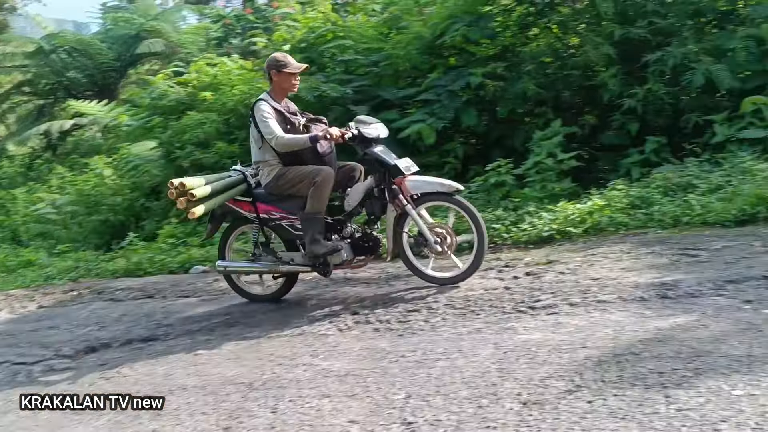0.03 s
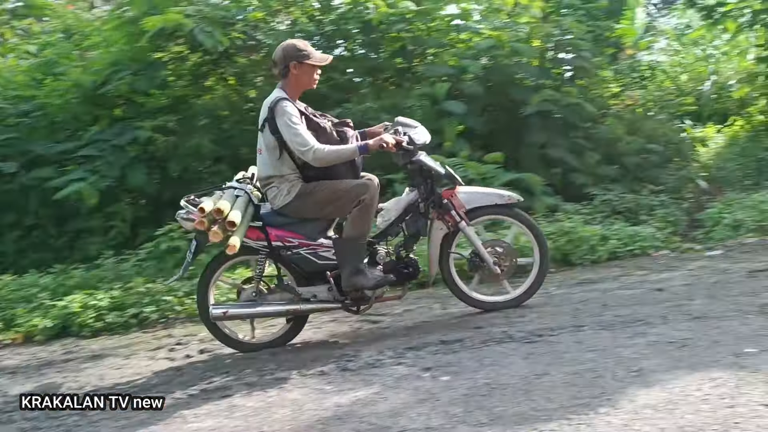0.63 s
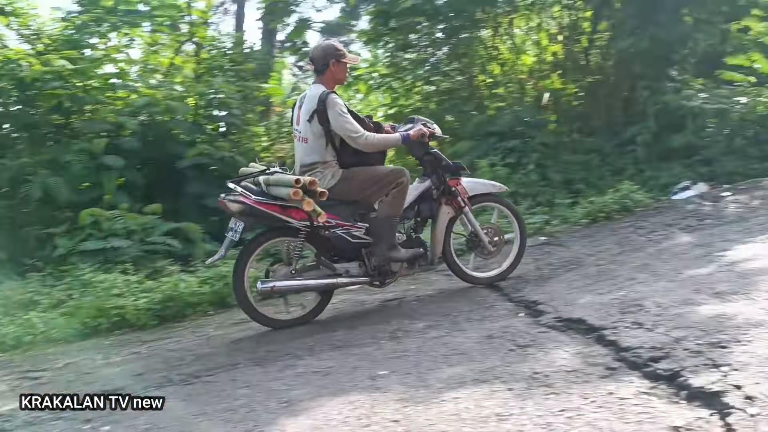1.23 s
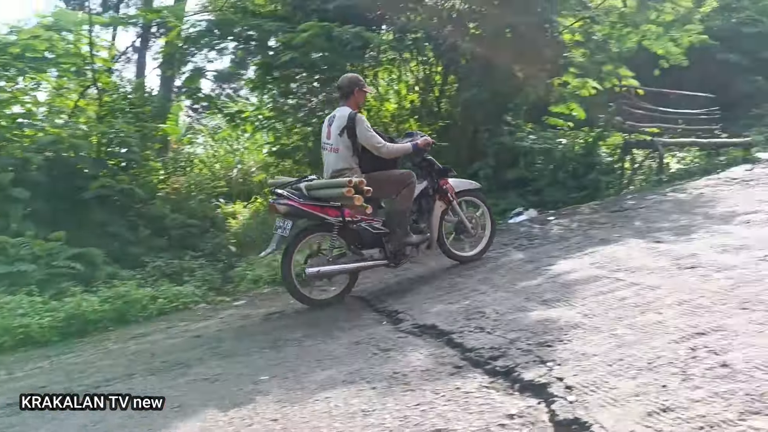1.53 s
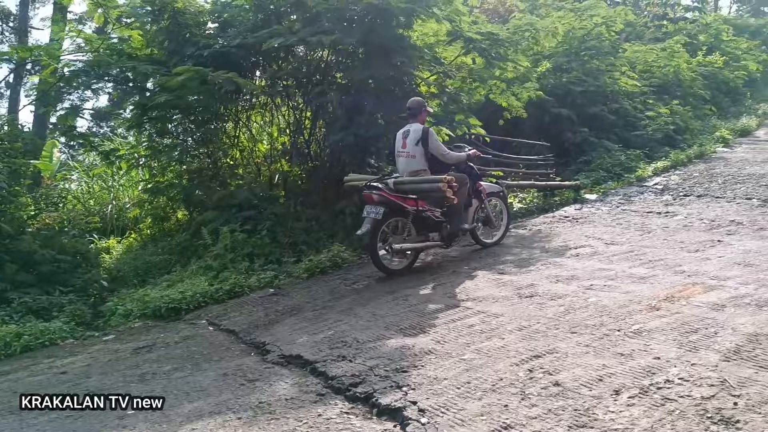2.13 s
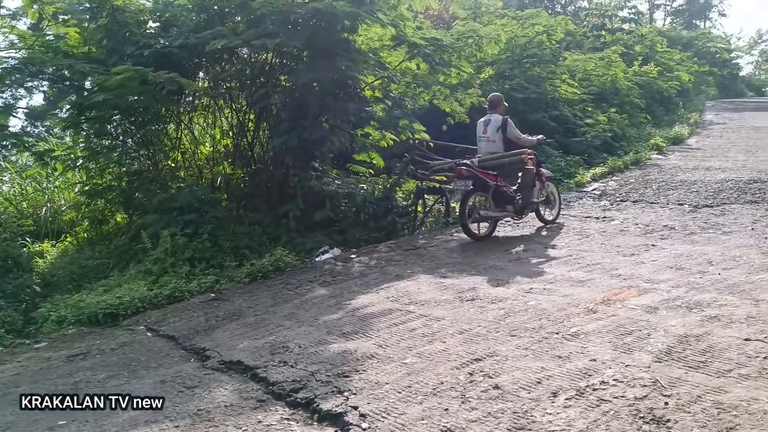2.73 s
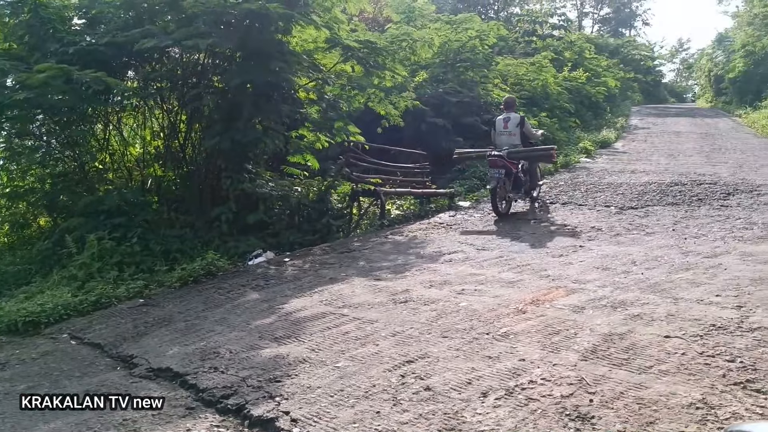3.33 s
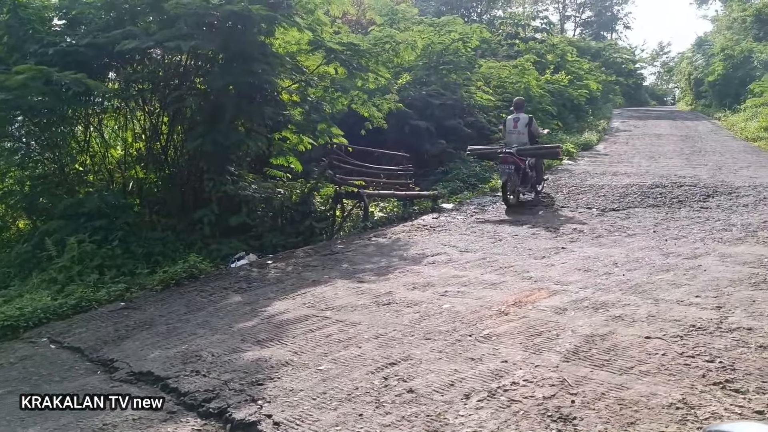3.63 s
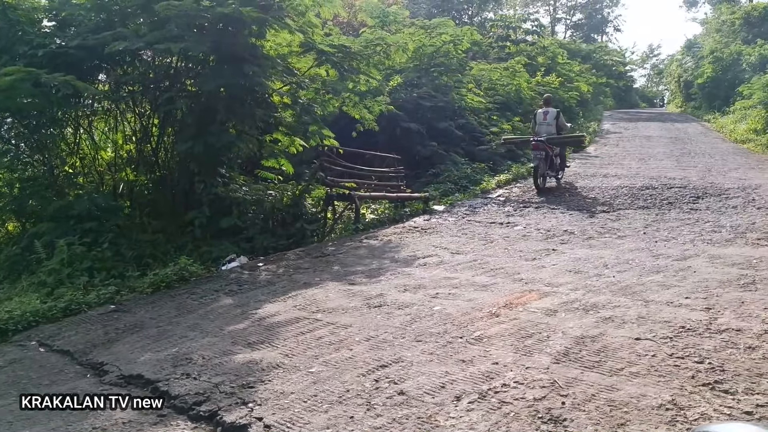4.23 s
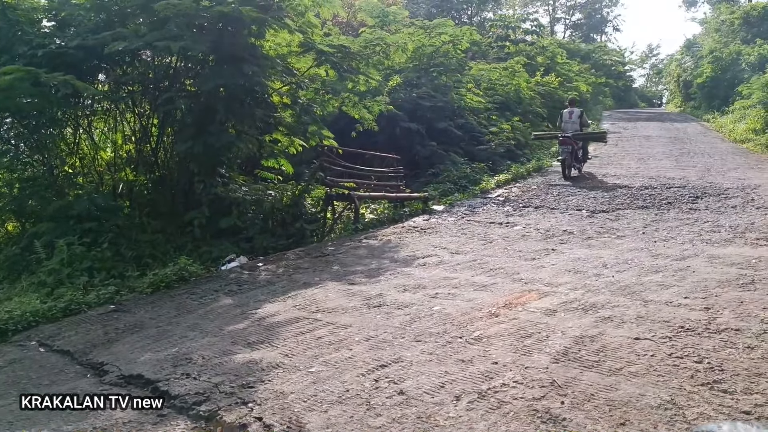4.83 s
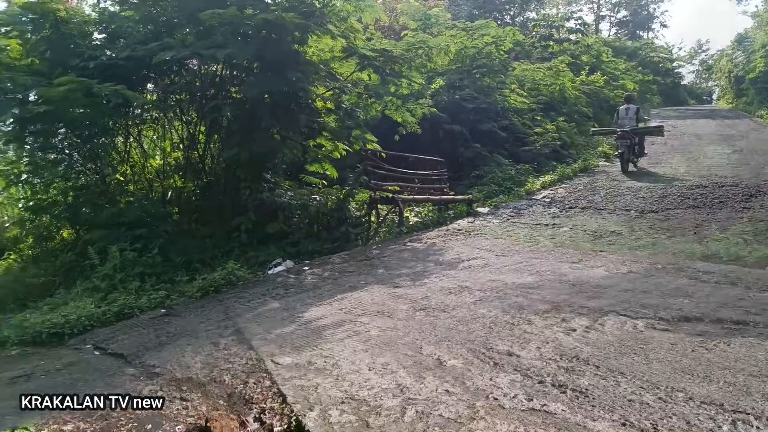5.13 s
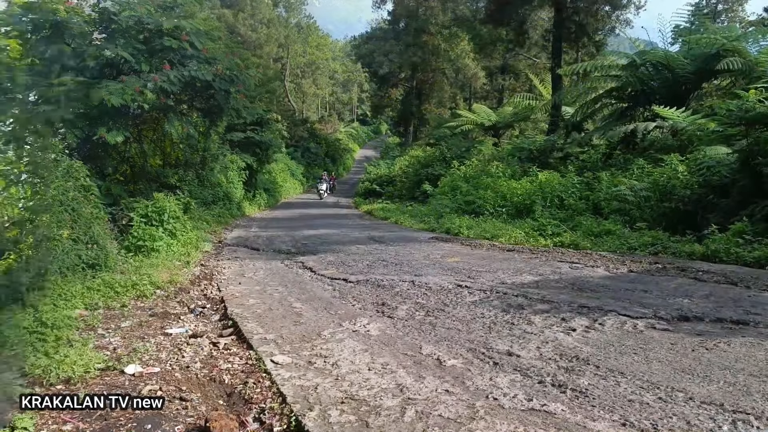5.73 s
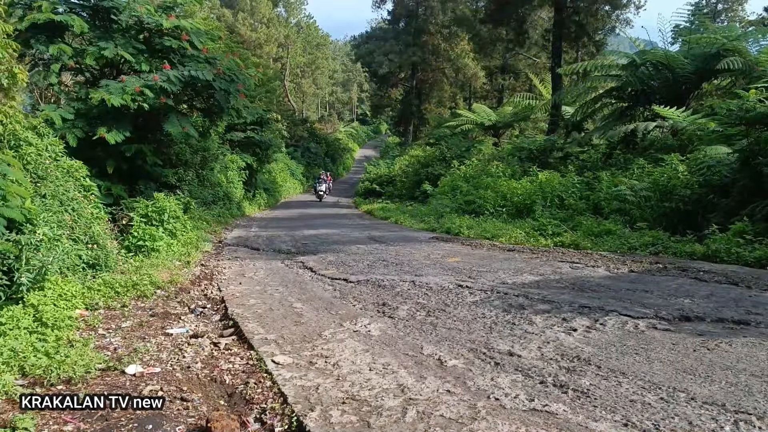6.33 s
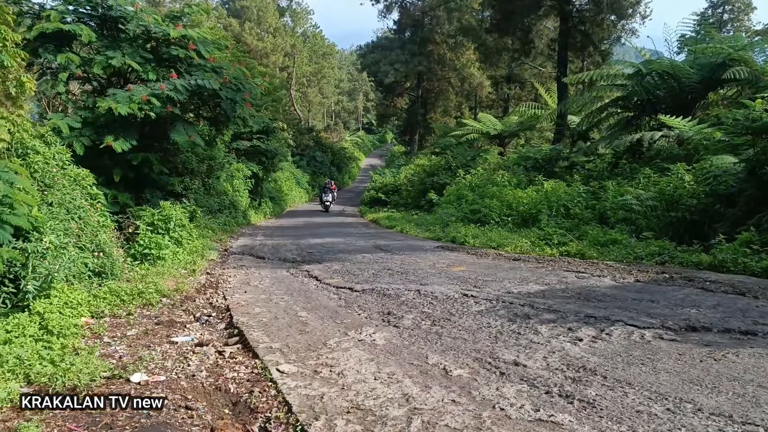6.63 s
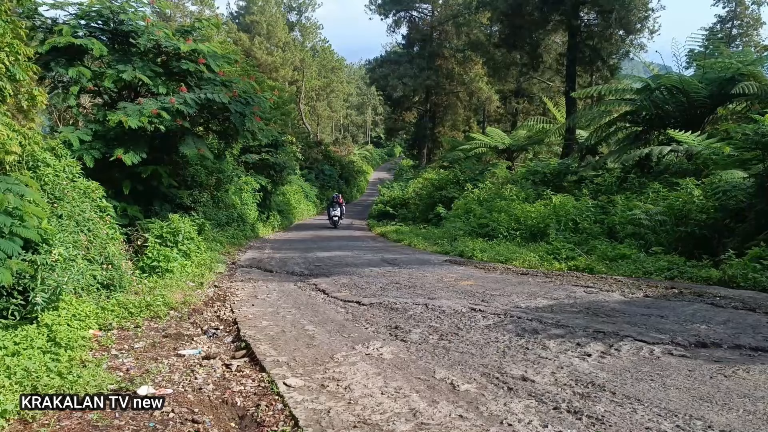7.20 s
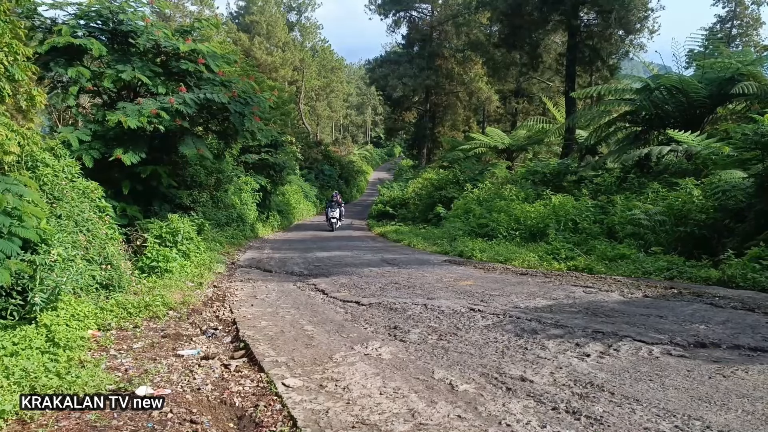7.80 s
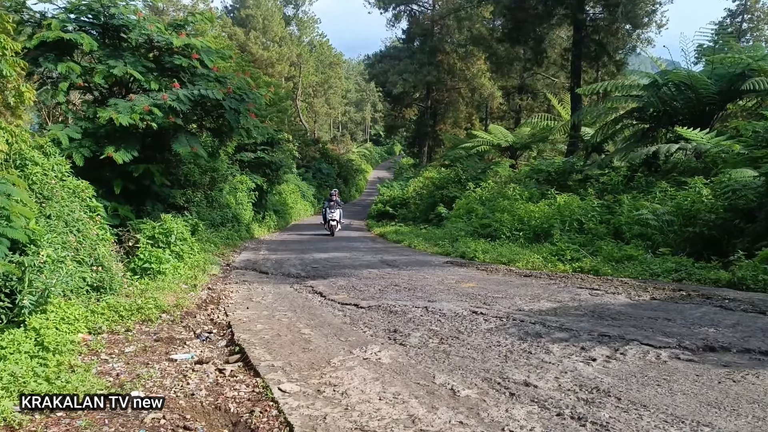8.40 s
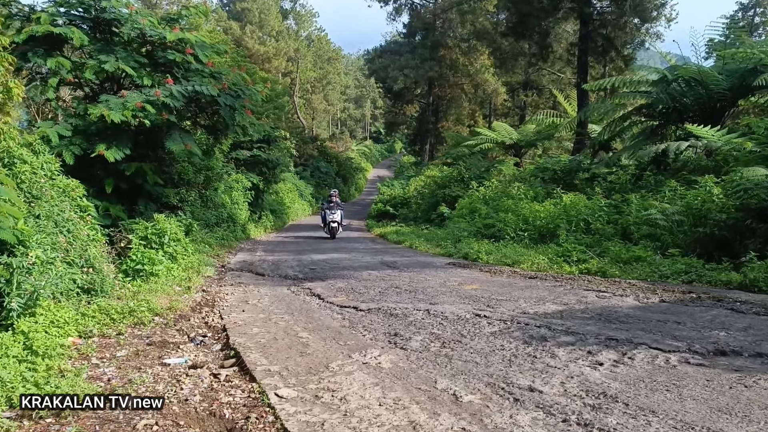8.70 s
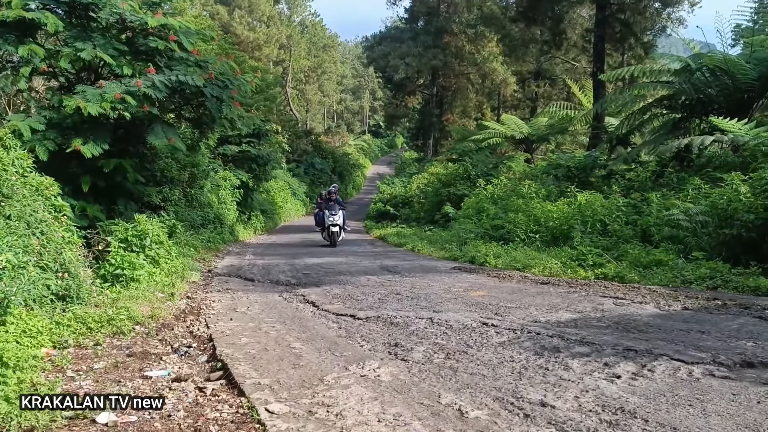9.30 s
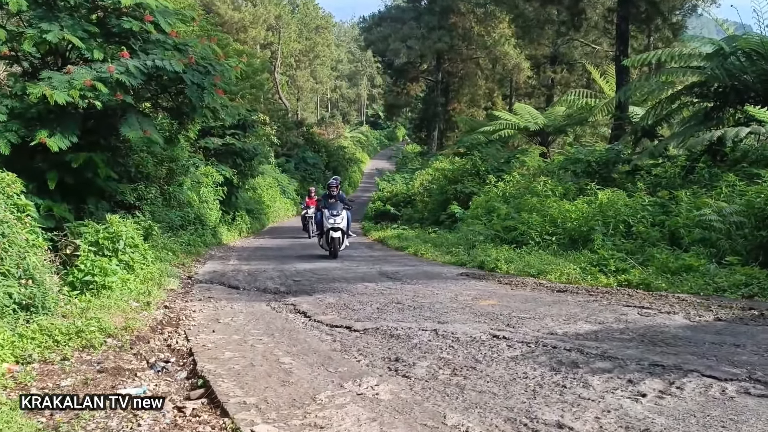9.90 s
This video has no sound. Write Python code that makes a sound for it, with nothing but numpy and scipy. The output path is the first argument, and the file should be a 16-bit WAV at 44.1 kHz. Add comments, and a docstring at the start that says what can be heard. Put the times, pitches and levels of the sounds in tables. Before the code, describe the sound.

A small motorbike labours past close by and climbs away, then several distant motorbikes drone over a faint forest hiss.

```python
"""Motorbikes on a forest hill

A small four-stroke motorbike labours past, close by, and climbs away up a steep road. Each firing rings
its silencer with a thud. The hill drags its revs down, and at each bump the rear wheel goes light, so
the engine races and its metal rings. After a moment of silence the sound fades in further along the
road: three distant bikes drone uphill, scattered by the trees, over the steady hiss of the forest."""
import sys
import numpy as np
from scipy import signal
from scipy.fft import rfft, irfft
from scipy.io import wavfile
from scipy.ndimage import uniform_filter1d

SR = 44100
rng = np.random.default_rng(int(sys.argv[2]) if len(sys.argv) > 2 else 0)


def transcribe(signal):
    """Save signal, clipped to [-1, 1], as a 16-bit WAV file at the path in sys.argv[1]."""
    frames = np.atleast_2d(signal).T
    limited = np.clip(frames, -1, 1)
    pcm = np.round(limited * 32767).astype(np.int16)
    wavfile.write(sys.argv[1], SR, pcm)


N = 438794
TIME = np.arange(N) / SR
SILENCE_FROM_S, RESUME_S, FADE_S = 5.203, 5.272, 0.31

# The near bike's revs as it climbs: time_s, firings_per_s
NEAR_REVS = [(0.0, 37.25), (0.75, 36.51), (1.15, 34.74), (1.6, 35.98), (1.9, 34.7), (2.7, 34.2),
             (3.05, 35.32), (3.6, 34.75), (3.85, 32.56), (4.1, 34.18), (4.5, 31.24), (4.7, 33.42),
             (5.2, 32.67)]
# Bumps that lighten its rear wheel: start_s, surge_firings_per_s
ROAD_BUMPS = [(0.32, 0.82), (0.55, 1.41), (1.45, 1.63), (1.68, 1.41), (1.97, 0.61), (3.02, 0.84),
              (3.36, 0.94), (4.03, 5.15), (4.84, 1.91)]
# Its loudness sinks as the bike draws away, then the sound fades out just before the silence:
# time_s, level_db
NEAR_LEVEL = [(0, -18), (1.3, -18), (2.3, -19), (3.35, -20), (3.95, -22.5), (4.5, -23.5), (4.95, -27),
              (5.2, -31)]
# Where we hear it from: time_s, view (0 beside, 1 behind, 2 or more far behind)
NEAR_VIEW = [(0, 0), (2.0, 0.66), (2.8, 1.02), (3.45, 1.43), (3.85, 2), (5.2, 3)]
# The tone of its silencer from those three views: pitch_hz, level_db
SILENCER_BESIDE = [(35, -35), (70, -7), (100, -10), (135, -21.5), (175, 0.5), (215, 1.5), (245, 0),
                   (262, 0.5), (292, -11), (335, -3), (420, -10), (495, -26.5), (660, -16.5), (950, -37),
                   (2500, -69)]
SILENCER_BEHIND = [(35, -36), (70, -8), (105, -13.5), (130, -10), (160, -9), (210, -5.5), (247, 3),
                   (282, -19.5), (312, -7), (390, -9.5), (425, -13.5), (475, -35), (660, -20.5), (950, -34),
                   (2500, -46.5)]
SILENCER_FAR = [(35, -31), (70, -10.5), (100, -10.5), (130, -11), (175, 2.5), (200, 2), (245, -2),
                (275, -13), (312, -2), (370, -12), (490, -23.5), (820, -22.5), (1300, -36.5), (2500, -37)]
# The tone of its rushing gas, and of its clattering valves and chain: pitch_hz, level_db
RASP_TONE = [(200, -0.5), (700, -2), (1300, -12), (2200, -5), (5000, -4), (8000, -5.5), (11000, -6),
             (16000, -21)]
CLATTER_TONE = [(100, 4.5), (600, 2.5), (1300, -3.5), (1900, -2.5), (2500, -2.5), (5600, -4), (6400, -6.5),
                (10000, -11), (13000, -19), (16000, -22)]
# The notes of its engine case and cooling fins: pitch_hz, width_hz, beside_db, behind_db
CASE_NOTES = [(1280, 107, -3.5, -15.5), (3358, 170, -3.5, 2), (3545, 120, 3.5, -6.5), (4270, 300, 0, -12),
              (4670, 120, -3.5, -1), (5240, 220, -4, -3)]
# Moments when a metal part faces us and sounds louder: part_name, peak_s, width_s, gain_db
FACING_MOMENTS = [("low mode", 0.19, 0.13, 4), ("low mode", 1.29, 0.22, 5.6),
                  ("high mode", 0.32, .42, 11.3), ("valve", 0.75, 0.36, 13.7), ("valve", 1.36, .25, 9.3),
                  ("valve", 4.58, 0.4, 8)]

# The far bikes' revs: time_s, scooter_firings_per_s, underbone_firings_per_s, third_firings_per_s
FAR_REVS = [(5.3, 42.5, 34.2, 56.8), (6.3, 42.8, 34.2, 56.7), (7.8, 42.7, 35.8, 53.7),
            (8.3, 43.3, 36.1, 53), (9.95, 43.2, 35.9, 51.6)]
# One row for each far bike, in that order: start_db, change_db_per_s, rev_waver_share
FAR_BIKES = [(-39, 1.5, .004), (-38, 0.18, .009), (-36.3, -0.27, 0.005975)]
# The tone of their silencers: pitch_hz, level_db
SCOOTER_SILENCER = [(43, -33.5), (86, -4), (129, -16.5), (172, -2), (214, 2.5), (258, -3), (300, -5),
                    (345, -18), (425, -11.5), (480, -28), (780, -14.5), (1150, -22.5), (1600, -25),
                    (2000, -44.5)]
UNDERBONE_SILENCER = [(35, -23), (70, -7), (105, -8.5), (140, -12), (175, -4), (208, 3), (245, 0),
                      (285, -11.5), (390, -8.5), (480, -23), (800, -22.5), (1500, -36), (2000, -38)]
THIRD_SILENCER = [(53, -25), (108, -0.5), (160, -14.5), (215, -8), (270, -10), (330, -16), (600, -19),
                  (1500, -42)]
# The underbone (a light step-through bike) is given more throttle: peak_s, gain_db
THROTTLE_PUSHES = [(6.2, 4.5), (7.7, 5), (9.7, 6.5)]
# The tone of the scooter's drive, of tyres and air, and of the forest: pitch_hz, level_db
BUZZ_TONE = [(400, -17.5), (600, -2.5), (740, 0), (900, -5.5), (1170, -5.5), (1600, -8.5), (2100, -19.5)]
RUSH_TONE = [(25, -22), (80, -1.5), (250, 2), (500, -1.5), (850, -1.5), (1200, -3), (1600, -4.5),
             (1900, -15.5), (3000, -20.5)]
FOREST_TONE = [(1500, -2.5), (2000, -7), (2400, 0), (2800, -8.5), (3500, 1), (4000, -4.5), (4800, 1.5),
               (5600, 1), (6200, -2.5), (7200, -18), (8500, -21), (9500, -9), (11000, -14.5),
               (13000, -30.5), (16000, -21)]

# The tone of the microphone's two openings: pitch_hz, left_db, right_db
MIC_TONE = [(980, 1, 1), (1370, -3, 0), (2340, 0.5, -1), (3380, 3, -4), (4770, 1, -2), (5670, 5, -3.5),
            (6280, -2, -1.5), (7470, -9.5, 4.5), (7720, -11, 0), (9090, 4, -7.5), (10120, 8, -13),
            (12650, -1, -2.5), (16000, -3.5, -0.5)]
# How strongly scattered sound differs between left and right: pitch_hz, difference_db
STEREO_SPREAD = [(60, -11.5), (200, -5.5), (500, -5.5), (1000, -6.5), (2000, 1.5), (16000, 1.5)]


def near_bike():
    """One cylinder working hard; from behind, the bike blocks some of its own clatter."""
    surge = wheel_hop()
    revs = in_time(NEAR_REVS)[0] + surge
    cycles = np.cumsum(revs) / SR + .45   # goes up by one for each firing
    level_db, view = in_time(NEAR_LEVEL)[0], in_time(NEAR_VIEW)[0]
    away = np.clip(view, 0, 2)
    thuds = from_db(level_db + 0.57 * surge) * exhaust(cycles, away)
    metal_db = level_db - 11 - 2 * view + 0.23 * surge
    left, right = thuds + from_db(metal_db) * engine_metal(cycles, revs, surge, away)
    lag_s = np.interp(TIME, [0, 5], [0, .0001])   # it moves off to the right, so the left hears it later
    return np.array([np.interp(TIME - lag_s, TIME, left), right])


def wheel_hop(bounce_hz=3.5, decay_s=.25):
    """Extra firings per second: after each bump the revs swing with the rear spring and settle."""
    surge = 0
    for start_s, size in ROAD_BUMPS:
        age_s = np.maximum(TIME - start_s, 0)
        surge = surge + size * np.sin(2 * np.pi * bounce_hz * age_s) * np.exp(-age_s / decay_s)
    return surge


def exhaust(cycles, away):
    """Each burst of gas rings the silencer; with distance the tone shifts and more of it is echo."""
    clicks = firings(cycles, uneven_db=.5, jitter_s=.00006)
    tones = (SILENCER_BESIDE, SILENCER_BEHIND, SILENCER_FAR)
    shares = [np.maximum(1 - abs(away - view), 0) for view in range(3)]
    thuds = steady(sum(share * colour(clicks, tone) for share, tone in zip(shares, tones)))
    # A bounce off the uneven road, its path always changing, keeps shifting the tone.
    bounce_s = .006 + .0012 * drift(2.5)
    thuds = steady(thuds + from_db(-19 + 2 * away) * np.interp(TIME - bounce_s, TIME, thuds))
    travel = 2.183 * TIME   # the paths through the trees change as the bike moves
    echo = sum(share * tree_echo(thuds, fade_s=0.39, above_hz=422)
               for share in (np.cos(travel), np.sin(travel)))
    return thuds + from_db(-9 + 5.5 * away) * echo


def engine_metal(cycles, revs, surge, away):
    """Valves and chain shake the engine hardest just before each thud; gas rasps out with the thud."""
    knocks = 0.84 + 0.21 * knock(cycles, -.1, 0.06) + 0.47 * knock(cycles, -.3, 0.14)
    shake = rms_one(knocks) * from_db(drift(130))
    blows = shake * direct_stereo(rng.standard_normal((2, N)))
    ringing = from_db(-1.5) * case_ring(blows, away) + valve_tick(blows, cycles, surge)
    rasp = from_db(-7) * gas_rasp(cycles)
    clatter = from_db(1) * shake * noise(CLATTER_TONE, spread_db=-1)
    return ringing + rasp + clatter + shake * chain_song(revs, surge, away) + gear_whine(cycles)


def case_ring(blows, away):
    """Blows ring the engine case and fins; the mix of notes changes as we get behind the bike."""
    behind = np.minimum(away, 1)
    ring = 0
    for pitch_hz, width_hz, beside_db, behind_db in CASE_NOTES:
        level_db = beside_db + (behind_db - beside_db) * behind + 2 * drift(14)
        ring = ring + from_db(level_db) * resonate(blows, pitch_hz, width_hz)
    return rms_one(ring)


def valve_tick(blows, cycles, surge):
    """The valves give a ringing tick once a cycle, louder when the engine races."""
    taps = blows * (0.14 + knock(cycles, -0.11, 0.14)) * from_db(2.3 * drift(25))
    level_db = -11 + 1.3 * surge + facing_db("valve")
    return from_db(level_db) * resonate(taps, pitch_hz=4110, width_hz=190)


def gas_rasp(cycles):
    """Gas rushes out in a hissing puff at each firing."""
    hiss = noise(RASP_TONE, spread_db=-4)
    return hiss * rms_one(knock(cycles, .04, .17) * from_db(1.5 * drift(35)))


def chain_song(revs, surge, away):
    """Chain and gears sing two notes; the low one climbs with the revs and flares when the wheel hops."""
    low_hz = 2380 + 44.8 * (revs - 35)   # the bike cruises at 35 firings per second
    low_db = -5.5 + 2.5 * surge + facing_db("low mode") - 1.5 * away + 2 * drift(12)
    high_db = -13 + facing_db("high mode")
    low = from_db(low_db) * metal_note(low_hz, width_hz=190)
    return low + from_db(high_db) * metal_note(pitch_hz=5745, width_hz=110)


def metal_note(pitch_hz, width_hz):
    """Many small blows keep one note of the metal ringing."""
    smoothing = signal.butter(2, width_hz / 2, fs=SR, output="sos")
    flutter = signal.sosfilt(smoothing, rng.standard_normal((2, 2, N)))
    phase = 2 * np.pi * np.cumsum(pitch_hz * np.ones(N)) / SR
    return rms_one(direct_stereo(flutter[0] * np.cos(phase) + flutter[1] * np.sin(phase)))


def facing_db(part):
    """How much louder a metal part gets as it faces us."""
    return sum(gain_db * swell(peak_s, width_s)
               for name, peak_s, width_s, gain_db in FACING_MOMENTS if name == part)


def gear_whine(cycles, teeth_per_cycle=34):
    """Gear teeth meet in step with the revs and whine briefly as the gearbox goes by."""
    loudness = from_db(-12.5 + 3 * drift(20)) * swell(peak_s=0.89, width_s=0.48)
    return loudness * rms_one(np.sin(2 * np.pi * teeth_per_cycle * cycles))


def far_bikes():
    """Three engines throb against each other, blurred by the trees; the scooter gains on us fastest."""
    elapsed_s = np.maximum(TIME - RESUME_S, 0)
    levels_db = [start_db + db_per_s * elapsed_s for start_db, db_per_s, _ in FAR_BIKES]
    levels_db[1] += sum(gain_db * swell(peak_s, width_s=0.37) for peak_s, gain_db in THROTTLE_PUSHES)
    bike_cycles = [np.cumsum(revs * (1 + waver * drift(6))) / SR
                   for revs, (_, _, waver) in zip(in_time(FAR_REVS), FAR_BIKES)]
    silencers = (SCOOTER_SILENCER, UNDERBONE_SILENCER, THIRD_SILENCER)
    drone, puffs = 0, 0
    for cycles, level_db, silencer in zip(bike_cycles, levels_db, silencers):
        clicks = firings(cycles, uneven_db=.8, jitter_s=.00004)
        drone = drone + from_db(level_db) * rms_one(colour(clicks, silencer))
        puffs = puffs + from_db(level_db) ** 2 * knock(cycles, 0, 0.081)
    drone = drone + from_db(levels_db[0] - 11.5) * scooter_buzz(bike_cycles[0])
    rush = road_rush(puffs, elapsed_s)
    return drone + from_db(-0.5) * tree_echo(drone, fade_s=0.37, above_hz=298) + rush


def scooter_buzz(cycles):
    """The scooter's drive buzzes once per turn of the engine, which is twice per firing."""
    return rms_one(colour(firings(2 * cycles, uneven_db=.8, jitter_s=.00002), BUZZ_TONE))


def road_rush(puffs, elapsed_s):
    """Tyres and air make a growing rush, and each firing adds a little puff of gas noise."""
    pulsing = rms_one(1.15 + 0.26 * rms_one(puffs))
    return from_db(-42 + 1.02 * elapsed_s) * pulsing * noise(RUSH_TONE, spread_db=-0.5)


def tree_echo(sound, fade_s, above_hz):
    """Banks and leaves scatter sound into a soft echo; deep tones pass straight through."""
    age_s = TIME[:SR // 4]
    tails = rng.standard_normal((2, len(age_s))) * from_db(-60 * age_s / fade_s) * (age_s > .004)
    highs = signal.sosfilt(signal.butter(3, above_hz, "high", fs=SR, output="sos"), sound)
    return wide_stereo(*[signal.oaconvolve(highs, tail / np.linalg.norm(tail))[:N] for tail in tails])


def forest():
    """An even, high hiss of insects and leaves."""
    return from_db(-44 + 0.58 * drift(15)) * noise(FOREST_TONE)


def firings(cycles, uneven_db, jitter_s):
    """One click per cycle, each a little different in strength and timing."""
    starts = np.flatnonzero(np.diff(np.floor(cycles)) > 0)
    timing, strength = rng.standard_normal((len(starts), 2)).T
    starts = np.clip(starts + (timing * jitter_s * SR).astype(int), 0, N - 1)
    clicks = np.zeros(N)
    clicks[starts] = from_db(uneven_db * strength)
    return clicks


def knock(cycles, start, decay):
    """A sudden rise once per cycle that dies away; start and decay are counted in cycles."""
    return np.exp(-((cycles - start) % 1) / decay)


def swell(peak_s, width_s):
    """A smooth rise to 1 and back down."""
    return np.exp(-((TIME - peak_s) / width_s) ** 2)


def drift(turns_per_s):
    """A random wander with a typical size of 1."""
    return rms_one(np.interp(TIME * turns_per_s, np.arange(4000), rng.standard_normal(4000)))


def in_time(table):
    """Joins a table's rows into smooth-running curves, one for each column after the time."""
    times_s, *columns = np.transpose(table)
    return [np.interp(TIME, times_s, column) for column in columns]


def resonate(sound, pitch_hz, width_hz):
    """Makes a sound ring around one pitch, at an average level of 1."""
    damping = np.exp(-np.pi * 1.5 * width_hz / SR)
    stage = [1, 0, -1, 1, -2 * damping * np.cos(2 * np.pi * pitch_hz / SR), damping * damping]
    return rms_one(signal.sosfilt([stage, stage], sound))


def colour(sound, tone, size=4096):
    """Shapes a sound with a table of pitch_hz, level_db; pitches beyond its ends fade away."""
    pitch_hz, level_db = np.transpose(tone)
    grid_hz = np.maximum(np.arange(size // 2 + 1) * SR / size, 1)
    edge_cut = np.maximum(pitch_hz[0] / grid_hz, 1) ** 2 * np.maximum(grid_hz / pitch_hz[-1], 1) ** 2
    gain = from_db(np.interp(np.log(grid_hz), np.log(pitch_hz), level_db)) / edge_cut
    # These steps make the filter ring after a click and never before it (minimum phase).
    cepstrum = irfft(np.log(gain + 1e-5))[:size // 2]
    cepstrum[1:] *= 2
    ring = irfft(np.exp(rfft(cepstrum, size)))
    return signal.oaconvolve(sound, ring)[:N]


def noise(tone, spread_db=0):
    """Stereo noise with the given tone; less spread makes it sound more direct."""
    shared, difference = [rms_one(colour(rng.standard_normal(N), tone)) for _ in range(2)]
    return wide_stereo(shared, from_db(spread_db) * difference)


def wide_stereo(shared, difference):
    """Scattered sound: the bass is much alike on the left and right, the treble is not."""
    return shared + colour(difference, STEREO_SPREAD) * np.array([[1], [-1]])


def direct_stereo(pair):
    """Sound straight from a few spots on the engine: partly alike on the left and right."""
    return pair[0] + from_db(-4.5) * pair[1] * np.array([[1], [-1]])


def steady(sound):
    """Evens out the level over a few firings."""
    size = SR // 7
    return sound / np.sqrt(uniform_filter1d(uniform_filter1d(sound ** 2, size), size) + 1e-9)


def rms_one(sound):
    """Scales a sound to an average (rms) level of 1."""
    return sound / np.sqrt(np.mean(sound ** 2) + 1e-20)


def from_db(db):
    """Turns decibels into a number to multiply by."""
    return np.exp(np.asarray(db) * (np.log(10) / 20))


def scene():
    """The near bike, a short silence, then the far bikes and the forest."""
    fade_in = np.clip((TIME - RESUME_S) / FADE_S, 0, 1)
    return near_bike() * (TIME < SILENCE_FROM_S) + (far_bikes() + forest()) * fade_in


def record(dry):
    """Each microphone opening colours the treble in its own way; the very highest pitches are cut."""
    tones = np.array(MIC_TONE)
    heard = [colour(dry[side], [(1, 0), *tones[:, [0, side + 1]]]) for side in range(2)]
    cutoff_hz = 15800
    return signal.sosfilt(signal.ellip(12, .1, 90, cutoff_hz, fs=SR, output="sos"), heard)


dry = scene()
out = record(dry)
transcribe(out)
```